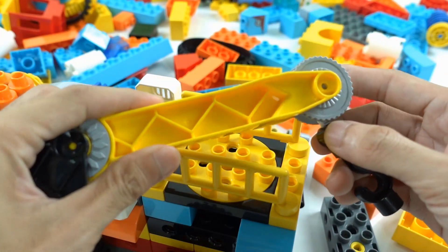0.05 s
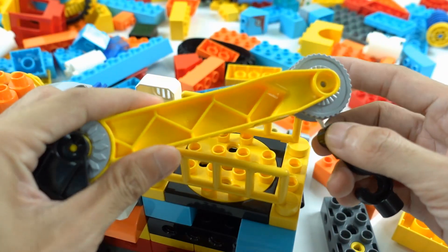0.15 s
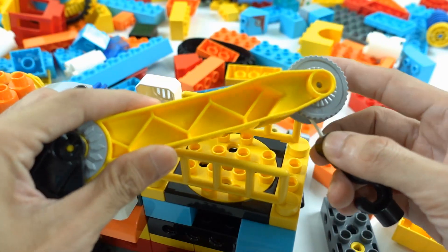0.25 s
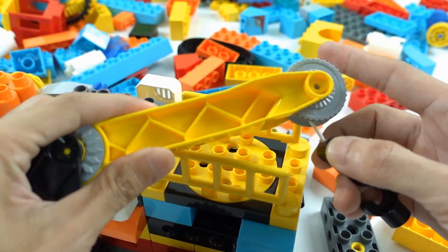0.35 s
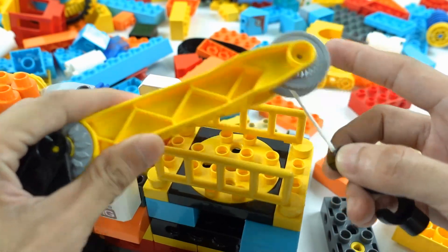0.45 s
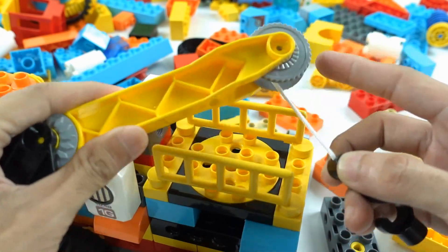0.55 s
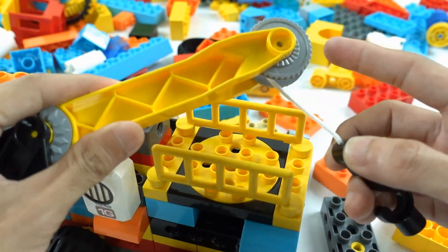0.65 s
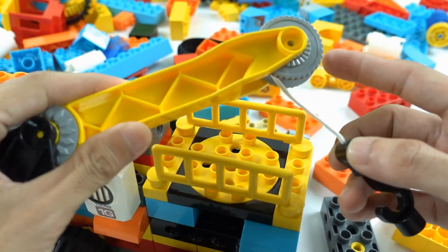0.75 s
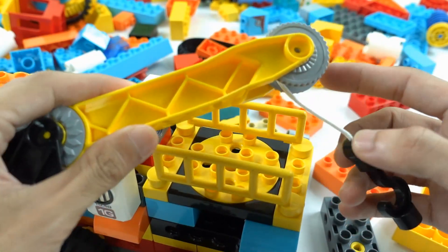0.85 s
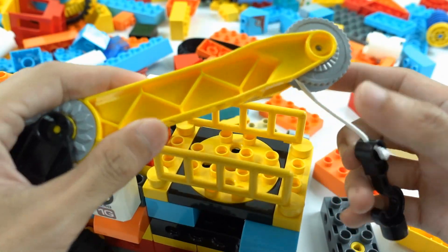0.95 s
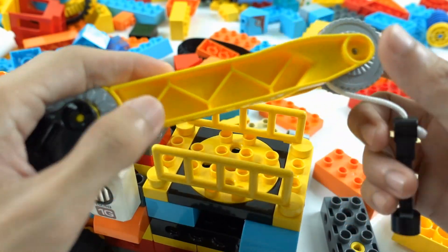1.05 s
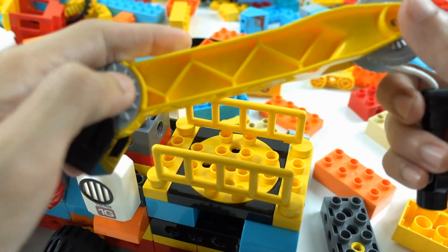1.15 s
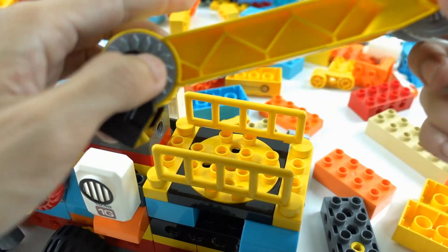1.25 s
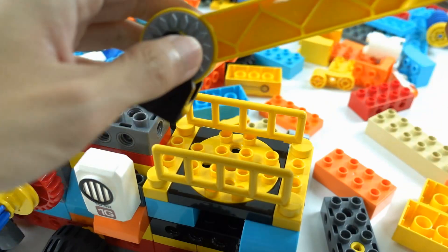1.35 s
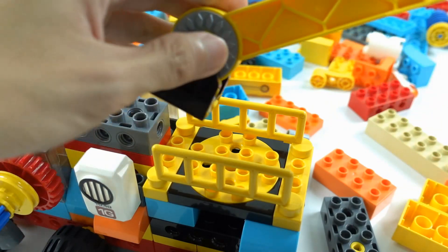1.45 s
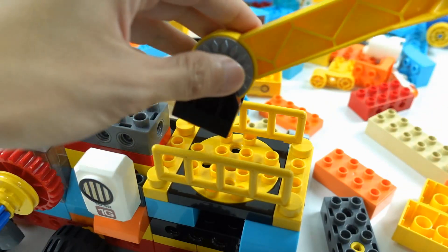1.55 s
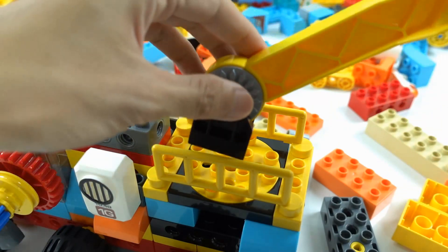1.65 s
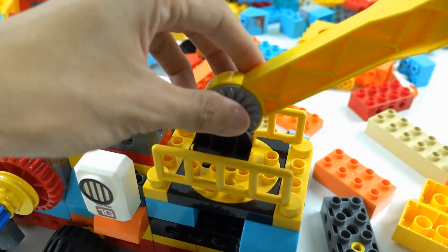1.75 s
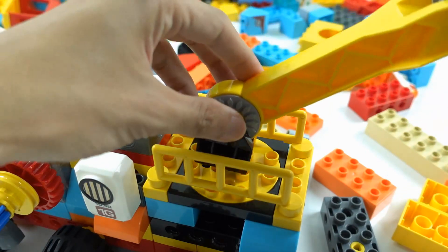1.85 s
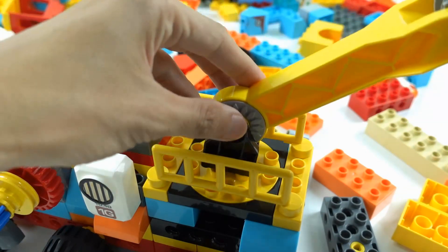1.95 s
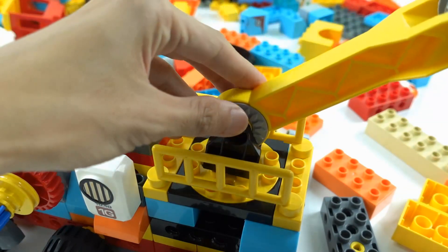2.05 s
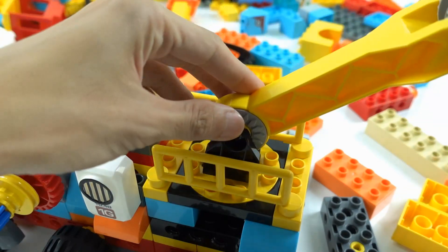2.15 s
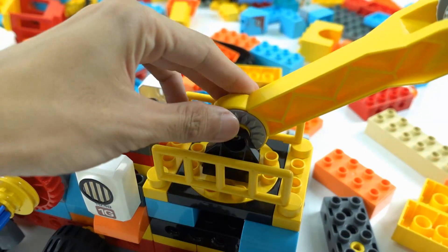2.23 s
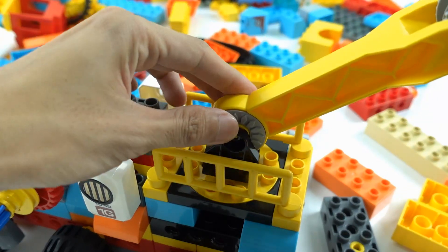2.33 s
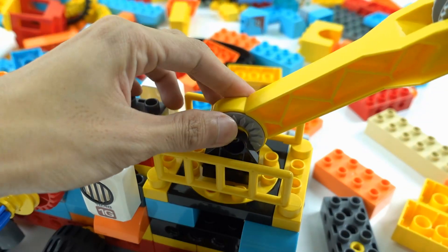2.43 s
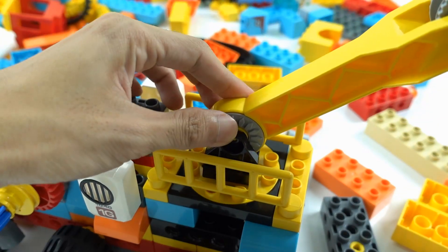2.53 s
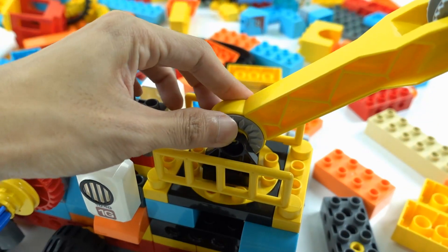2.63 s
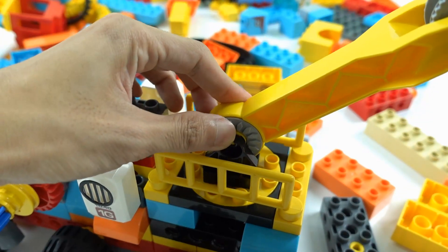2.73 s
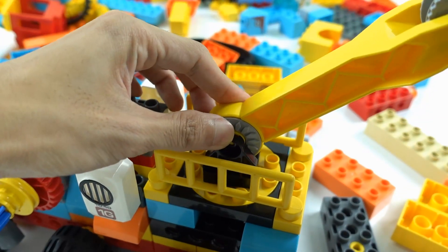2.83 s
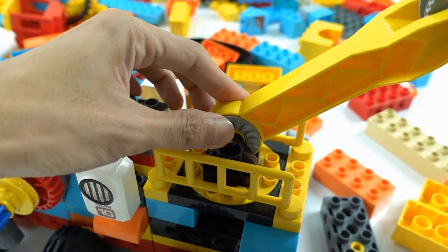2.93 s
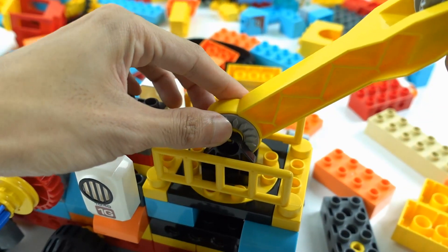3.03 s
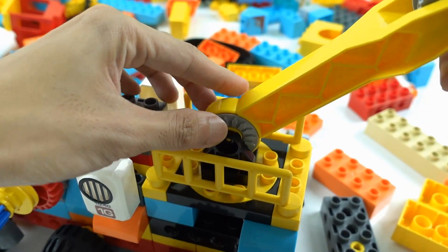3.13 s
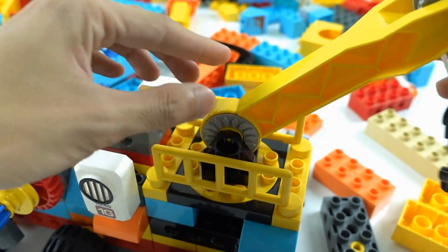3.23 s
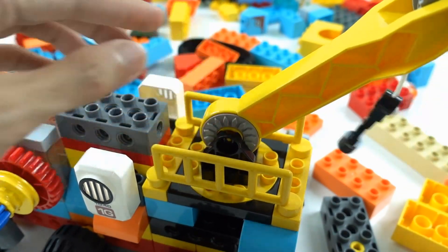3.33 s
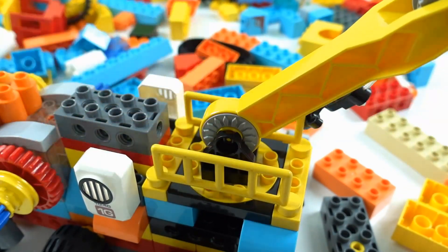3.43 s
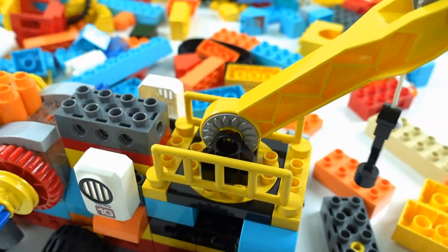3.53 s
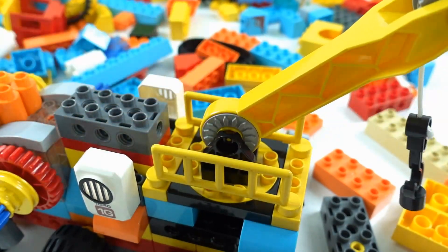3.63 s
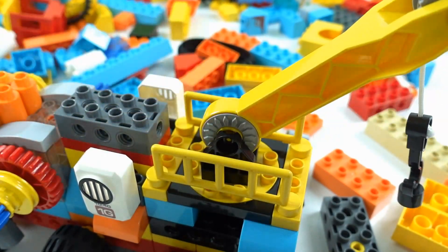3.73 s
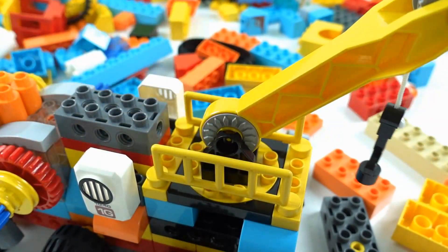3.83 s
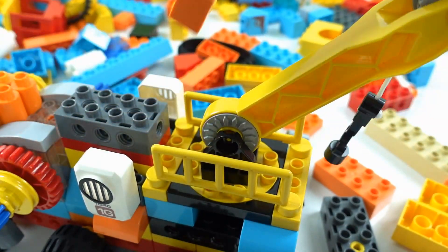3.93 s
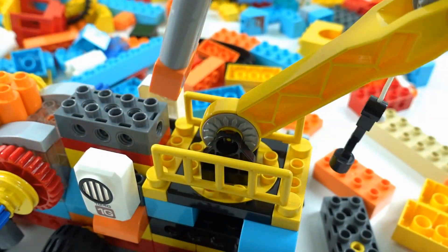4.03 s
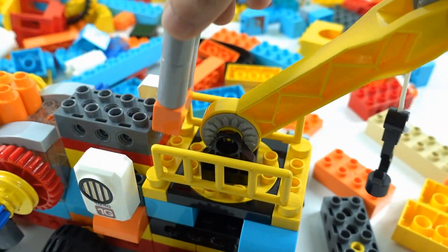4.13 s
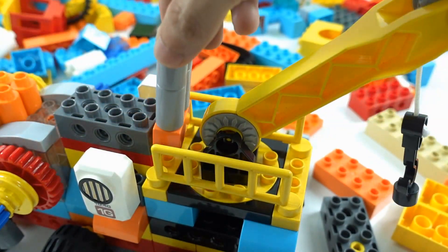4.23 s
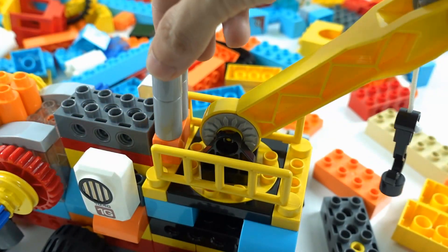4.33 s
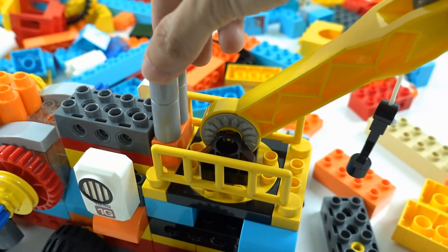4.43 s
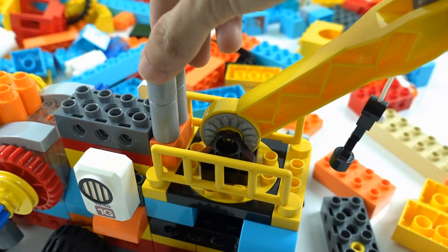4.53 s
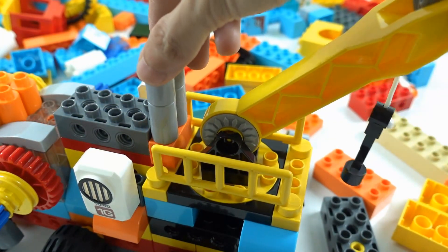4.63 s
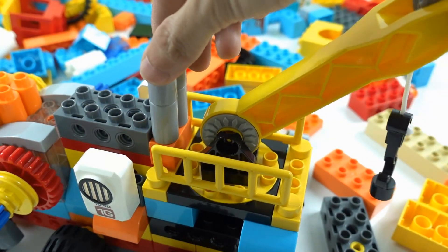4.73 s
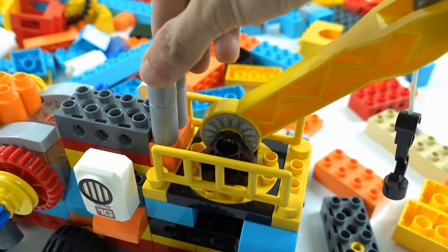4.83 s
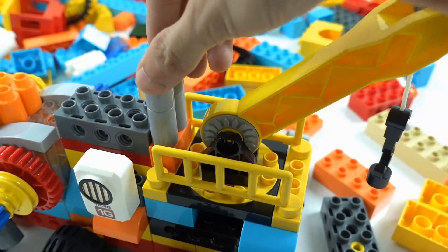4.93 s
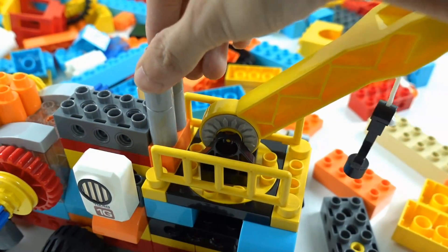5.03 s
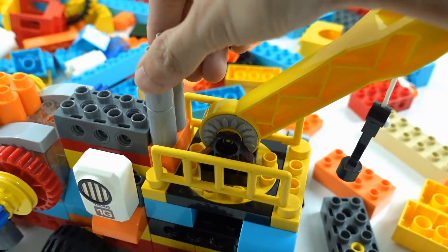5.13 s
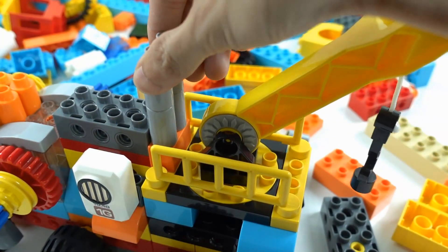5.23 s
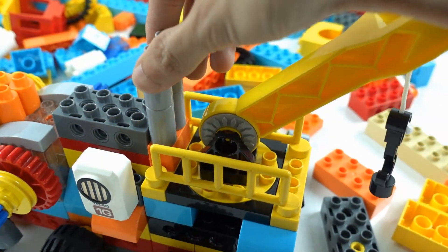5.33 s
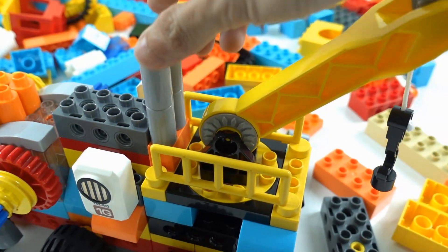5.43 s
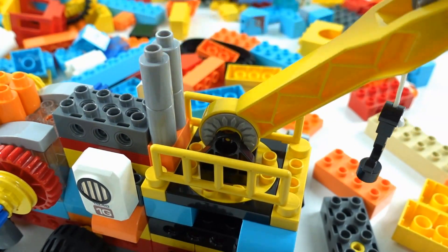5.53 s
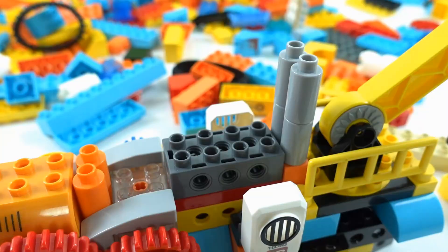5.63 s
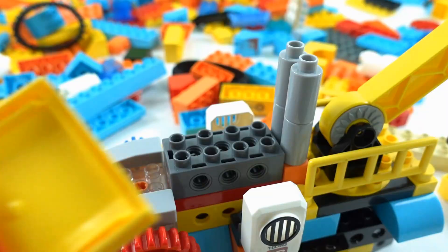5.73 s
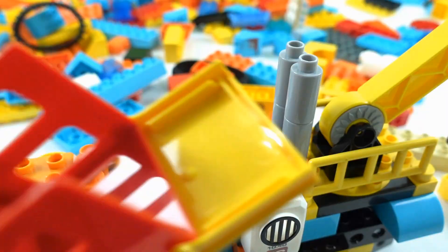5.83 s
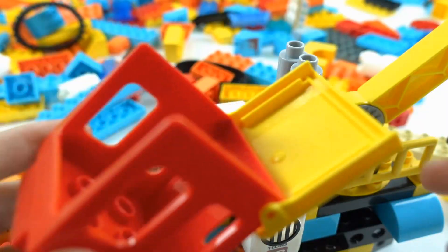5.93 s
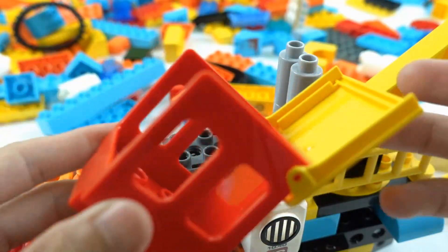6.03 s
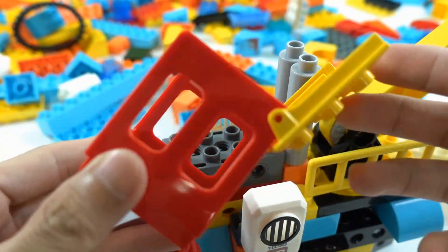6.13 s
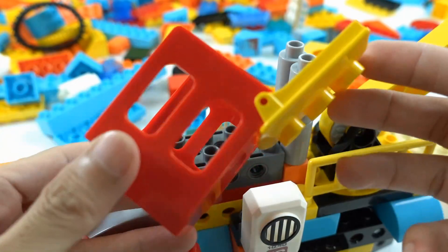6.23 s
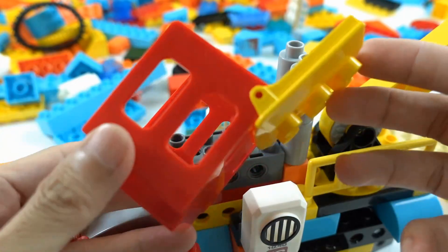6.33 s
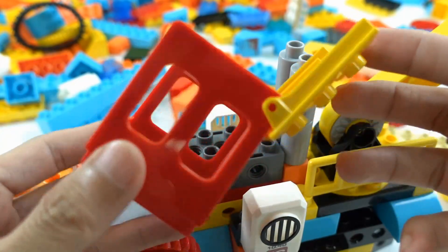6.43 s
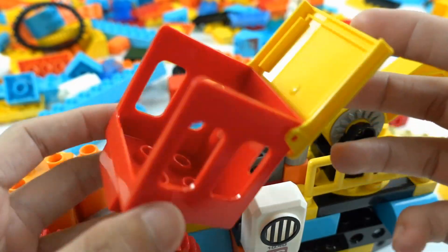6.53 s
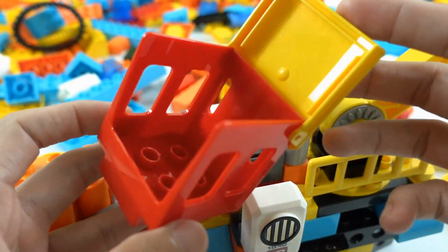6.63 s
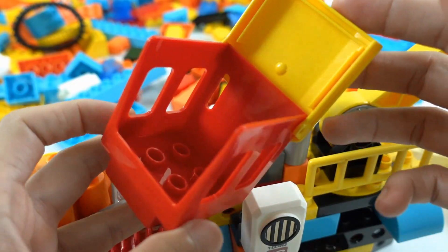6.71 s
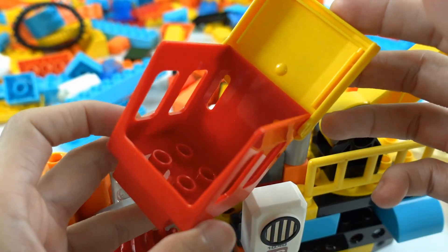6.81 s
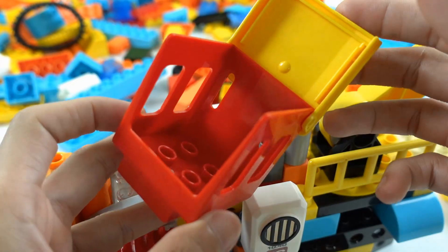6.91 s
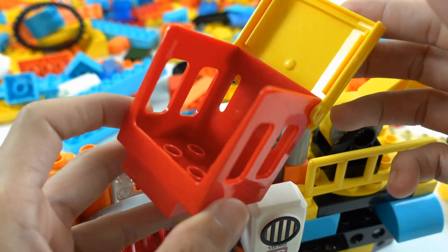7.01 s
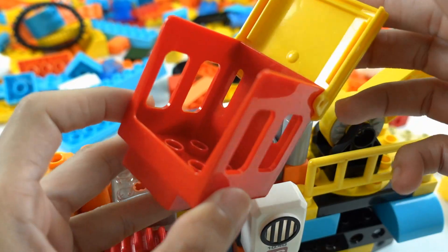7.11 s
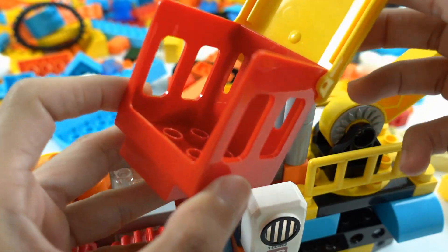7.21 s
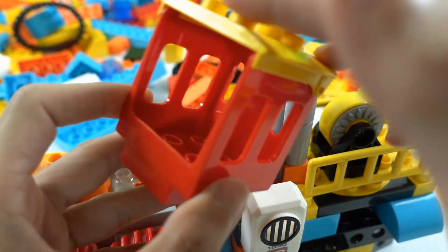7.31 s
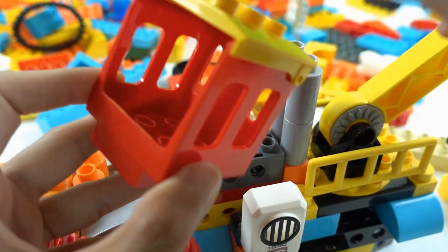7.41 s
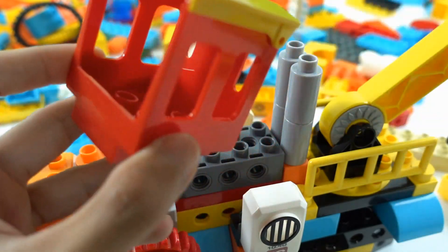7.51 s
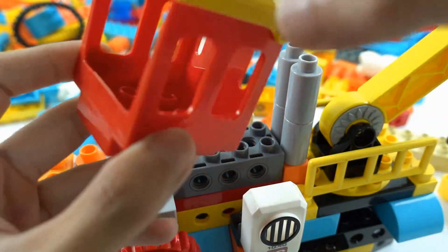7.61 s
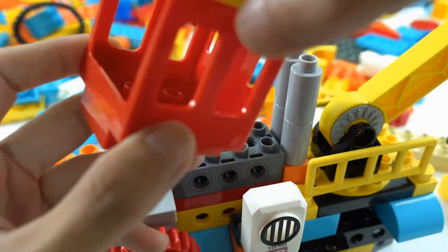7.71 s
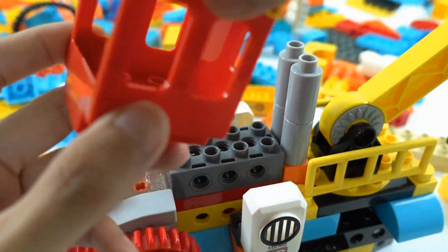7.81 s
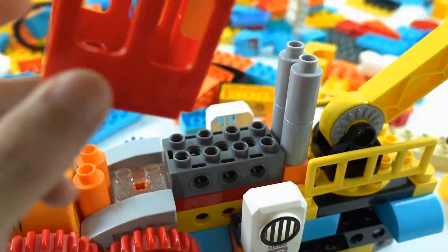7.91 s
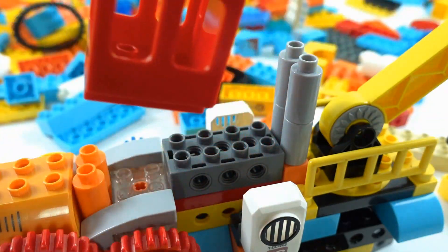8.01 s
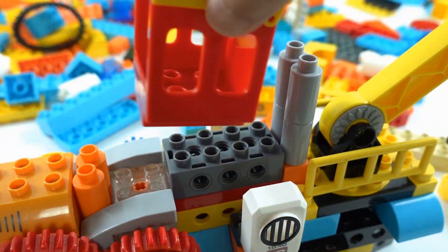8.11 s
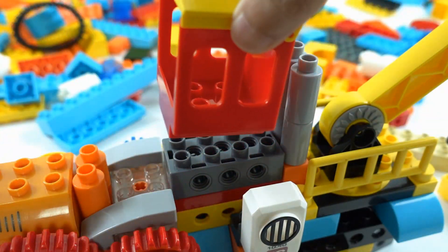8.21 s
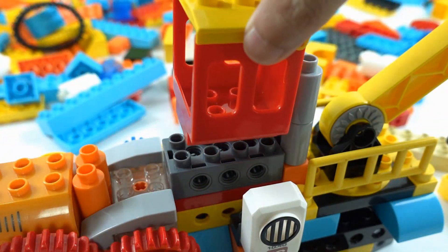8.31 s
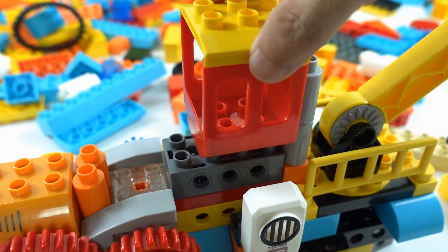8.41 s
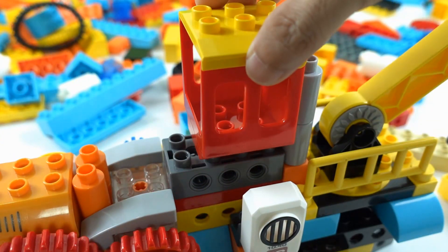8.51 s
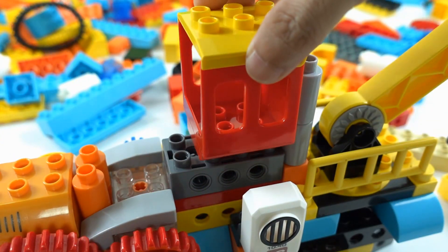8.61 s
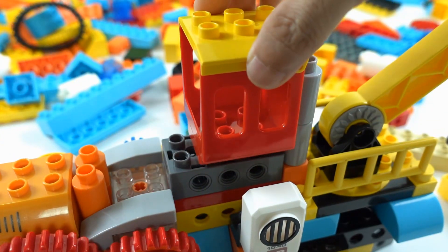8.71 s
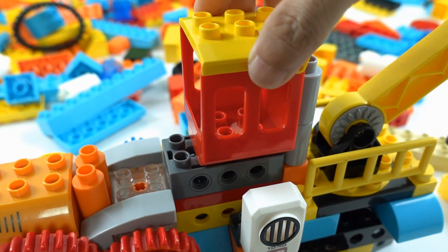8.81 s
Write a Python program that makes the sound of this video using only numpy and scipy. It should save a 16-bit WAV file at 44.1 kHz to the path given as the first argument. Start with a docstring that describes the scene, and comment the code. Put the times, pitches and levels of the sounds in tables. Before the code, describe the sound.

Close stereo pickup in a small, fairly live room. A toy reel ticks and zips in a fast plastic ratchet, then a boom snaps into place in two clusters of hard clicks. A hook knocks once, pipes knock and click onto studs, a hinge ticks softly, a lid clacks and creaks shut, and a cab is pressed down with crunchy snaps. Faint steady air lies beneath.

```python
"""Building a toy crane

Hands build a toy crane from large hollow plastic blocks on a table in a small, fairly live room.
A string is drawn off a ratcheting reel, the boom is snapped onto its turntable, the hook swings against the model,
two pipes are pushed onto studs, a hinged lid is worked and creaks shut, and the cab is pressed down.
Noise-like contacts excite each part's resonances; pushes ring the table, and steady air lies beneath."""
import sys
import numpy as np
from scipy import signal
from scipy.fft import rfft, irfft, next_fast_len
from scipy.io import wavfile

SR = 44100
rng = np.random.default_rng(int(sys.argv[2]) if len(sys.argv) > 2 else 0)


def store_wav(level_fs):
    """Save 16-bit WAV to argv[1]."""
    pcm = np.round(np.clip(np.atleast_2d(level_fs), -1, 1) * 32767)
    wavfile.write(sys.argv[1], SR, pcm.T.astype(np.int16))


N = 390726
TIME = np.arange(N) / SR
SNAP_S = 0.0076   # the time over which the level of a snap or thump counts as rms


def from_db(db):
    """Level law: 20 dB is a factor of ten in amplitude."""
    return 10 ** (np.asarray(db) / 20)


def unit_energy(x):
    """Energy normalisation: scale to an energy of one per channel."""
    channels = len(np.atleast_2d(x))
    return x / np.sqrt(np.sum(x ** 2) / channels + 1e-30)


def at_hz(points, hz):
    """Logarithmic pitch: read a table on a log-frequency axis."""
    f, value = np.transpose(points)
    return np.interp(np.log(np.maximum(hz, 1)), np.log(f), value)


def cut(x, hz, kind, order=2):
    """Butterworth filtering: a passband without ripple."""
    return signal.sosfilt(signal.butter(order, hz, kind, fs=SR, output="sos"), x)


def panned(x, pan_db):
    """Level-difference stereo: the left exceeds the right by pan_db."""
    return x * from_db(np.array([[pan_db], [-pan_db]]) / 2)


def add(out, s, sound):
    """Superposition: mix a sound in at a time, up to the end of the scene."""
    i = max(round(s * SR), 0)
    out[:, i:i + sound.shape[1]] += sound[:, :N - i]


def resonate(x, modes):
    """Modal synthesis: parallel two-pole resonances with alternating signs."""
    out = 0
    for k, (hz, width, db) in enumerate(modes):
        r = np.exp(-np.pi * width / SR)   # a wider resonance dies sooner
        poles = [1, -2 * r * np.cos(2 * np.pi * hz / SR), r * r]
        ringing = (1 - r * r) / 2 * signal.lfilter([1, 0, -1], poles, x + 1e-18)
        out = out + (-1) ** k * from_db(db) * ringing
    return out


def stereo_noise(colour, likeness, size):
    """Interchannel coherence: noise with a spectrum and a left-right likeness."""
    padded = next_fast_len(size)
    hz = np.arange(padded // 2 + 1) * SR / padded
    alike = at_hz(likeness, hz)
    mid, side = rfft(rng.standard_normal((2, padded)))
    both = np.sqrt(1 + alike) * mid + np.sqrt(1 - alike) * side * [[1], [-1]]
    return irfft(both * from_db(at_hz(colour, hz)), padded)[:, :size]


def scatter(fade_ms, attack_ms=0.41, side_db=-8, size=4096):
    """Multiple scattering: edges bite, then waves bounce between the walls, unlike to each side."""
    ms = np.arange(size) * 1000 / SR
    fade = from_db(-60 * ms / fade_ms) * (1 - np.exp(-ms / attack_ms))
    spectrum = rfft(rng.standard_normal((2, size)) * fade)
    even = spectrum / np.abs(spectrum)   # the contact has no pitch of its own: the part gives it one
    mid, side = irfft(even) * np.sqrt(fade)
    return unit_energy(mid + from_db(side_db) * side * [[1], [-1]])


def struck(modes, spread_db=2):
    """Modal participation: where a contact lands decides how strongly each resonance answers."""
    luck = rng.standard_normal(len(modes))
    return [(hz, width, db + spread_db * each) for (hz, width, db), each in zip(modes, luck)]


def shell(force, modes, low_hz=450):
    """Radiation efficiency: a small hollow part rings in its modes and radiates little bass."""
    return cut(resonate(force, modes), low_hz, "high")


def favour(sound, favoured, width_hz=210):
    """Local resonance: the wall nearest to a contact rings more strongly than the rest."""
    if not favoured:
        return sound
    hz, boost_db = favoured
    return sound + resonate(sound, [(hz, width_hz, boost_db)])


def snaps(table, modes, scatter_ms, room_db, pan_db=-1.5, scrape_ms=0.25, room_top_hz=14000):
    """Repeated impact: each contact bites, catches and rebounds; returns direct sound and room send."""
    bite_db = -1
    catch_s, catch_db = 0.003, -6      # an edge slides and catches again a moment later
    rebound_s, rebound_db = 0.0087, -11.5   # every part touches once more as it settles
    out = np.zeros((2, N))
    for s, level_db, bass_db, treble_db, *favoured in table:
        catch_late, rebound_late = np.array([catch_s, rebound_s]) * np.exp(0.25 * rng.standard_normal(2))
        touches = [(0, bite_db), (catch_late, catch_db), (rebound_late, rebound_db)]
        for late_s, loss_db in touches:
            hit = favour(shell(scatter(scatter_ms, scrape_ms), struck(modes)), favoured)
            # soft, heavy contacts favour the bass; hard edges favour the treble
            hit = hit + (from_db(bass_db) - 1) * cut(hit, 900, "low", order=1)
            hit = hit + (from_db(treble_db) - 1) * cut(hit, 6000, "high", order=1)
            gain = from_db(level_db + loss_db) * np.sqrt(SNAP_S * SR)
            add(out, s + late_s, gain * unit_energy(hit))
    send = cut(out, room_top_hz, "low", order=1) * from_db(room_db)
    return np.array([panned(out, pan_db), send])


def slips(runs, modes, fade_db_per_s, slowing_per_s, jitter, uneven_db, scatter_ms, side_db, thin_hz, pan_db, room_db):
    """Stick-slip: uneven trains of light clicks, each slowing and fading; returns direct sound and room send."""
    out = np.zeros((2, N))
    for start, end, first_rate, level_db, *favoured in runs:
        s = start
        for wait, strength in rng.standard_normal((60, 2)):   # at most 60 clicks
            if s > end:
                break
            elapsed = s - start
            rate = first_rate * np.exp(-slowing_per_s * elapsed)
            click_db = level_db - fade_db_per_s * elapsed + uneven_db * strength
            gain = from_db(click_db) * np.sqrt(SR / rate)   # the level is that of the train
            click = favour(shell(scatter(scatter_ms, side_db=side_db), struck(modes)), favoured)
            add(out, s, gain * unit_energy(cut(click, thin_hz, "high")))
            s += np.exp(jitter * wait) / rate
    return np.array([panned(out, pan_db), out * from_db(room_db)])


# Spectrum of the room tone before its bass is cut: pitch_hz [Hz], density_db [relative dB per Hz]
AIR_COLOUR = [(120, -31), (200, -11.5), (304, -12.5), (585, -9.5), (974, -3.5), (1150, -10), (1400, -11.5),
              (1620, -2), (1910, -13), (2290, -8), (3010, -13.5), (15500, -18.5)]
# Coherence of the room tone: pitch_hz [Hz], left_right_likeness [0 to 1]
AIR_LIKENESS = [(250, 0.46), (1000, 0.01), (4000, 0)]


def room_air(level_db=-61.5):
    """Stationary noise: the room's steady air is coloured noise with its bass cut steeply."""
    air = cut(stereo_noise(AIR_COLOUR, AIR_LIKENESS, N), 230, "high", order=6)
    return from_db(level_db) * np.sqrt(N) * unit_energy(air)


# Grips in which fingers take hold of a part and press it home: start_s [s], end_s [s], level_db [dB]
GRIPS = [(2.073, 2.59, -67.5), (2.739, 2.82, -55), (4.5, 5.2, -75)]


def grip_pressure():
    """Exponential relaxation: each grip tightens quickly, holds and relaxes."""
    pressure = from_db(-88)   # the hands never lie quite still
    for start, end, level_db in GRIPS:
        tighten = 1 - np.exp(-np.maximum(TIME - start, 0) / 0.006)   # time constants in s
        relax = np.exp(-np.maximum(TIME - end, 0) / 0.095)
        pressure = pressure + from_db(level_db) * tighten * relax
    return pressure


def fingers(per_s=70, spread_db=5, tick_db=-3, rumble_db=-18):
    """Poisson friction: tiny slips under the fingers tick in the plastic and rumble in the table."""
    born = rng.random(N) < per_s / SR
    force = born * from_db(spread_db * np.clip(rng.standard_normal(N), -2, 2))
    contacts = signal.oaconvolve(force[None], scatter(8.1), axes=1)[:, :N]
    ticks = unit_energy(shell(contacts, STUD_MODES))
    rumble = unit_energy(cut(force, [90, 240], "band", order=3))
    grip = grip_pressure() * np.sqrt(N)
    return grip * (from_db(tick_db) * ticks + from_db(rumble_db) * rumble)


# Reverberation time, the time to fall by 60 dB: pitch_hz [Hz], t60_s [s]
ROOM_T60 = [(200, 1), (1000, 0.53), (3000, 0.55), (6000, 0.45), (14000, 0.35)]
# Spectrum of the reflections as they set out: pitch_hz [Hz], level_db [relative dB]
ROOM_COLOUR = [(200, -7), (1000, 0.5), (3000, -4.5), (6000, -3), (14000, 3)]
# Coherence of the reflections: pitch_hz [Hz], left_right_likeness [0 to 1]
ROOM_LIKENESS = [(200, 0.25), (1000, 0.66), (3000, 0.76), (10000, .15)]


def room_response(build_s=0.002, size=32768):
    """Diffuse reverberation: dense reflections build up quickly and die sooner in the treble."""
    t = np.arange(size) / SR
    hz = np.arange(size // 2 + 1) * SR / size
    build_up = 1 - np.exp(-(t / build_s) ** 2)
    noise = rfft(stereo_noise(ROOM_COLOUR, ROOM_LIKENESS, size) * build_up)
    centres = np.array(ROOM_T60)[:, 0]
    out = 0
    for (_, t60), share in zip(ROOM_T60, np.eye(len(ROOM_T60))):
        band = at_hz(np.c_[centres, share], hz)   # overlapping bands that sum to one
        out = out + irfft(noise * band) * from_db(-60 * t / t60)
    return unit_energy(out)


def in_room(direct, send, room):
    """Convolution: the direct sound is followed by its reflections."""
    reflections = signal.oaconvolve(send.mean(0)[None], room, axes=1)[:, :N]
    return direct + panned(from_db(8.0) * reflections, pan_db=-0.6)


# Single ticks of the reel: start_s [s], level_db [dB], bass_db [dB], treble_db [dB]
REEL_TICKS = [(0.3162, -28, -27, -4.5), (0.5195, -38.5, 12, -5), (1.082, -60.5, 6.5, 9.5)]
# Resonances of the reel: pitch_hz [Hz], width_hz [Hz], level_db [dB]
REEL_MODES = [(718, 350, -24), (1346, 200, -12), (2020, 707, -14), (2986, 970, -8), (3735, 1500, -7.5),
              (4168, 280, 0.5), (4685, 280, -4), (5244, 280, 0.5), (5870, 170, -11.5), (6597, 380, -7),
              (7944, 540, -14), (9015, 520, -7.5), (14500, 820, -25)]


def reel_ticks():
    """Impact excitation: single contacts ring the reel's modes."""
    return snaps(REEL_TICKS, REEL_MODES, scatter_ms=16, room_db=-1.0)


# Runs of the pawl over the reel's teeth, first tugged, then running on; level before the boom's hum:
# start_s [s], end_s [s], first_rate [clicks per s], level_db [dB], favoured_hz [Hz], boost_db [dB]
REEL_RUNS = [(0.571, 0.623, 240, -17.5, 9430, -4.5), (0.627, 0.699, 300, -26, 5330, -3)]
# Hum of the hollow boom under the reel: pitch_hz [Hz], width_hz [Hz], level_db [dB]
BOOM_HOLLOW = [(608, 260, 19.5), (770, 36, 21.5)]


def reel_ratchet():
    """Periodic impact: a pawl clicks over teeth as the string is drawn almost evenly; the hollow boom hums along."""
    ratchet = slips(REEL_RUNS, REEL_MODES, fade_db_per_s=8.5, slowing_per_s=4, jitter=.2, uneven_db=1.1,
                    scatter_ms=8.9, side_db=-3.5, thin_hz=2560, pan_db=-1.5, room_db=-5.0)
    return ratchet + resonate(ratchet, BOOM_HOLLOW)


# Snaps of the boom onto its turntable: start_s [s], level_db [dB], bass_db [dB], treble_db [dB]
BOOM_SNAPS = [(2.0315, -32, 15.5, 0), (2.081, -34.5, 9, -10), (2.141, -33.5, 19, -4),
              (2.2665, -23.5, 2.5, -3), (2.557, -54, 17, 3), (2.7495, -43.5, 13, -14),
              (2.763, -47, 19, -11), (2.844, -33, 8, 1), (2.8685, -25.5, 5.5, 3.5), (2.8875, -31.5, 9, 6),
              (3.073, -50, 7, -8), (3.083, -42.5, -11, -4), (3.189, -49, -3, -7), (3.2165, -42.5, 19, 31)]
# Resonances of the boom: pitch_hz [Hz], width_hz [Hz], level_db [dB]
BOOM_MODES = [(692, 58, -12), (940, 280, -10.5), (1640, 270, -3), (1885, 68, 3), (2280, 360, -1),
              (2800, 250, 7.5), (3305, 91, 8.5), (3540, 230, 3.5), (4360, 1300, -2.5), (5040, 250, 3),
              (5450, 1800, -3), (8550, 5000, 6.5), (8820, 4400, 6)]


def boom_snaps():
    """Impact excitation: snapping contacts ring the boom's modes."""
    return snaps(BOOM_SNAPS, BOOM_MODES, scatter_ms=23, room_db=-9.0, room_top_hz=7560)


# Pushes that reach the table: start_s [s], level_db [dB]
THUMPS = [(2.753, -56), (2.809, -65), (2.875, -59), (2.895, -57), (2.919, -57), (4.32, -62), (4.563, -61),
          (4.76, -64.5), (5.146, -64), (6.944, -60.5), (8.595, -65.5), (8.798, -54)]
# Resonances of the table and the model's base: pitch_hz [Hz], width_hz [Hz], level_db [relative dB]
TABLE_MODES = [(112, 36, -22), (225, 29, 5.5), (322, 44, 2.5), (440, 230, -3)]


def table_thumps(size=8192):
    """Impulse response: each push sets the table and the model's base ringing low."""
    out = np.zeros((2, N))
    thump = unit_energy(resonate(signal.unit_impulse(size), TABLE_MODES)) * np.sqrt(SNAP_S * SR)
    for s, level_db in THUMPS:
        add(out, s, from_db(level_db) * np.array([thump, thump]))
    return out


# Knocks of the hook against the model: start_s [s], level_db [dB], bass_db [dB], treble_db [dB]
HOOK_KNOCKS = [(3.533, -28, -5, 2.4), (3.542, -38.5, 9.5, -1)]
# Resonances of the hook: pitch_hz [Hz], width_hz [Hz], level_db [dB]
HOOK_MODES = [(790, 150, -14.5), (1230, 590, -21.5), (1820, 160, -4.5), (2440, 380, -5), (3070, 360, -2.5),
              (4020, 850, -13.5), (4740, 210, -11), (5160, 320, -17.5), (6100, 193, -14),
              (6900, 370, -17.5), (10927, 1900, -25)]


def hook_knocks(room, end_s=3.652):
    """Impact and reverberation: the hook's modes ring in the room, and the tail stops short."""
    direct, send = snaps(HOOK_KNOCKS, HOOK_MODES, scatter_ms=28, room_db=-8.5)
    return in_room(direct, send, room) * (TIME < end_s)


# Knocks of the pipes: start_s [s], level_db [dB], bass_db [dB], treble_db [dB]
PIPE_KNOCKS = [(4.3165, -26.5, -1.6, -26)]
# Resonances of the pipes: pitch_hz [Hz], width_hz [Hz], level_db [dB]
PIPE_MODES = [(654, 61, -15), (1120, 220, -13.5), (1616, 150, -5), (1770, 110, 0.5), (2290, 310, -11),
              (2820, 190, -12.5), (3250, 160, -9.5), (4580, 330, -17), (6320, 390, -18.5),
              (8300, 1050, -27.5)]


def pipe_knocks():
    """Impact excitation: a knock rings the pipes' modes."""
    return snaps(PIPE_KNOCKS, PIPE_MODES, scatter_ms=12.5, room_db=-8.5, pan_db=1.0)


# Snaps of the pipes onto studs: start_s [s], level_db [dB], bass_db [dB], treble_db [dB]
STUD_SNAPS = [(4.53, -31.5, 4.5, 13), (4.553, -32.5, 4, 1), (4.564, -37.5, 13, -5), (4.69, -47, 8, 11),
              (4.742, -32.5, -30, -20), (4.759, -41.5, -14, 7), (5.0725, -40, 10, 22),
              (5.1425, -38.5, -11, -28), (5.28, -56, -7, -15), (5.484, -56.5, 12, 1),
              (5.508, -54.5, -8.5, -18)]
# Resonances of the studs, also ticked by the fingers: pitch_hz [Hz], width_hz [Hz], level_db [dB]
STUD_MODES = [(591, 1200, -9.5), (1184, 53, 3.5), (1294, 220, -8.5), (1440, 63, 0), (1795, 185, -1.5),
              (2343, 110, 0.5), (2580, 154, 1), (3260, 720, -3.5), (4440, 880, -9), (6270, 800, -12.5),
              (7540, 560, -16), (8400, 293, -12), (10300, 2300, -19.5)]


def stud_snaps():
    """Impact excitation: pushing pipes onto studs rings the studs' modes."""
    return snaps(STUD_SNAPS, STUD_MODES, scatter_ms=30.5, room_db=-10.5)


# Ticks of the hinge, each singling out one resonance:
# start_s [s], level_db [dB], bass_db [dB], treble_db [dB], favoured_hz [Hz], boost_db [dB]
HINGE_TICKS = [(6.192, -48, -12.5, 8, 1930, 7.5), (6.2515, -52.5, -7, 14, 3200, 13),
               (6.3175, -38.5, 6.5, 12.5, 1060, -3), (6.518, -50.5, -1, 0, 1180, 6),
               (6.5665, -41.5, 9, -18, 2090, 14), (6.588, -37.5, -11, -28, 2290, 12),
               (6.942, -45.5, 5, -2, 2010, 2)]
# Resonances of the hinge: pitch_hz [Hz], width_hz [Hz], level_db [dB]
HINGE_MODES = [(900, 1400, -4.5), (1136, 200, 3.5), (1628, 52, 6.5), (1990, 145, 5), (2410, 180, -5),
               (3040, 210, -2), (3620, 210, -11), (5030, 180, -7), (6200, 670, -16.5), (8700, 170, -13),
               (10100, 7800, -25)]


def hinge_ticks():
    """Impact excitation: slower-biting contacts ring the hinge's modes."""
    return snaps(HINGE_TICKS, HINGE_MODES, scatter_ms=25, room_db=-9, scrape_ms=1.2)


# Clacks of the lid, each singling out one resonance:
# start_s [s], level_db [dB], bass_db [dB], treble_db [dB], favoured_hz [Hz], boost_db [dB]
LID_CLACKS = [(7.388, -41, 5, 12, 3700, 9), (7.426, -21, -22, 4.5, 3410, 4), (7.468, -38, -8, 4, 2720, -3),
              (7.8695, -37, 4, -6, 1980, 6), (7.899, -50, 0, 20, 1990, -1), (8.053, -51, 4, 5, 3900, -11)]
# Resonances of the lid: pitch_hz [Hz], width_hz [Hz], level_db [dB]
LID_MODES = [(1022, 280, -9.5), (1120, 960, -16), (1630, 340, -10.5), (1968, 82, -0.5), (2850, 460, -11),
             (2450, 470, -11.5), (3425, 206, -5.5), (4330, 2700, -16), (5280, 180, -7.5),
             (5930, 650, -19.5), (8140, 920, -15.5), (9000, 1300, -17.5), (13400, 5000, -26)]


def lid_clacks():
    """Impact excitation: contacts ring the thin lid's modes."""
    return snaps(LID_CLACKS, LID_MODES, scatter_ms=24, room_db=-8)


# Short shoves in which the lid's hinge sticks and slips:
# start_s [s], end_s [s], first_rate [clicks per s], level_db [dB at the start], favoured_hz [Hz], boost_db [dB]
HINGE_SHOVES = [(7.4445, 7.464, 420, -22.5, 2000, -4), (7.484, 7.513, 406, -27.5, 2630, -7),
                (7.522, 7.543, 340, -32, 1880, -3), (7.549, 7.566, 340, -37, 2770, 19),
                (7.576, 7.605, 320, -40, 3430, 5)]


def hinge_creak():
    """Stick-slip: the hinge slips in bursts, each strongest at its start, and the lid rings."""
    return slips(HINGE_SHOVES, LID_MODES, fade_db_per_s=137, slowing_per_s=6, jitter=.5, uneven_db=2.0,
                 scatter_ms=6.0, side_db=-1, thin_hz=510, pan_db=-4.0, room_db=-4)


# Snaps of the cab as it is pressed down, each singling out one resonance:
# start_s [s], level_db [dB], bass_db [dB], treble_db [dB], favoured_hz [Hz], boost_db [dB]
CAB_SNAPS = [(8.54, -33.5, -26.5, -6.5, 2600, 16.5), (8.5455, -34, -19, -5, 2080, 10),
             (8.563, -35.5, -13, 0, 2000, 10), (8.595, -30.5, 6, 8.5, 3820, -4),
             (8.7965, -28.5, 17.5, 22, 1080, -26)]
# Resonances of the cab: pitch_hz [Hz], width_hz [Hz], level_db [dB]
CAB_MODES = [(1010, 460, -2.5), (1260, 420, -3), (1680, 240, -4), (2050, 160, -2), (2480, 490, -8),
             (3280, 210, -8), (3700, 210, -6.5), (4350, 120, -9), (4870, 330, -6.5), (5720, 320, -3.5),
             (6840, 310, -7.5), (7700, 220, -7), (9000, 3600, -14)]


def cab_snaps():
    """Impact excitation: slower-biting contacts ring the thin-walled cab's modes."""
    return snaps(CAB_SNAPS, CAB_MODES, scatter_ms=28, room_db=-8.0, scrape_ms=1.17, room_top_hz=3250)


def scene():
    """Superposition: snaps, ratchet, creak and handling sound in one room, over its steady air."""
    room = room_response()
    blocks = (reel_ticks() + reel_ratchet() + boom_snaps() + pipe_knocks() + stud_snaps()
              + hinge_ticks() + lid_clacks() + hinge_creak() + cab_snaps())
    handling = fingers() + table_thumps()
    direct, send = blocks + handling   # handling is equally loud in both
    return in_room(direct, send, room) + hook_knocks(room) + room_air()


def record(dry):
    """Band limiting: an elliptic filter cuts the top steeply above 15.9 kHz."""
    return signal.sosfilt(signal.ellip(10, .2, 75, 15900, fs=SR, output="sos"), dry)


dry = scene()
out = record(dry)
store_wav(out)
```